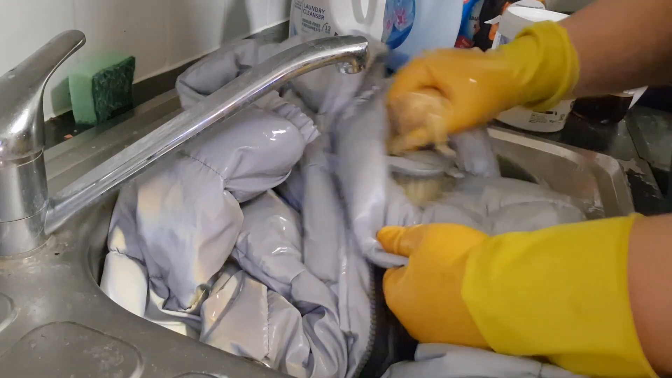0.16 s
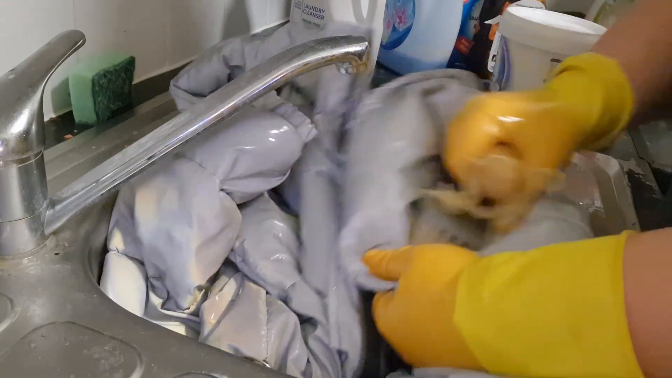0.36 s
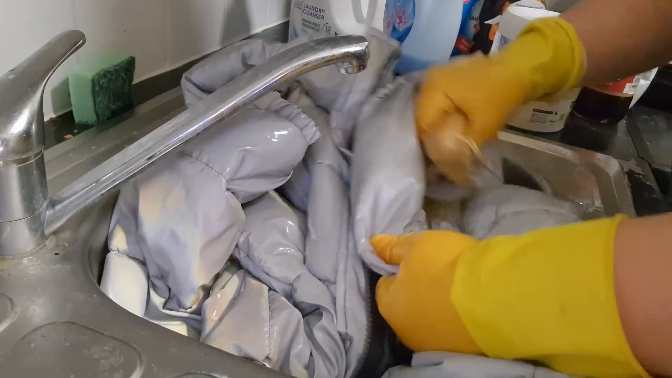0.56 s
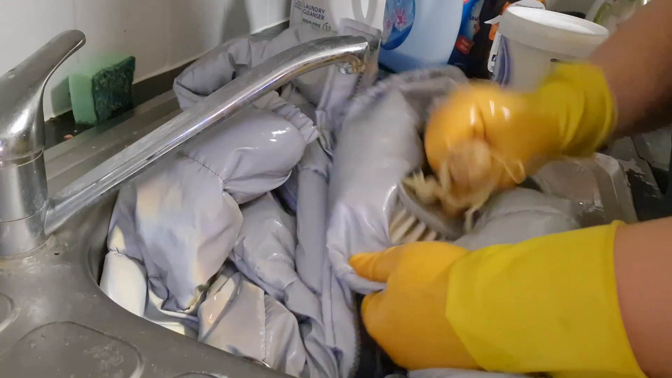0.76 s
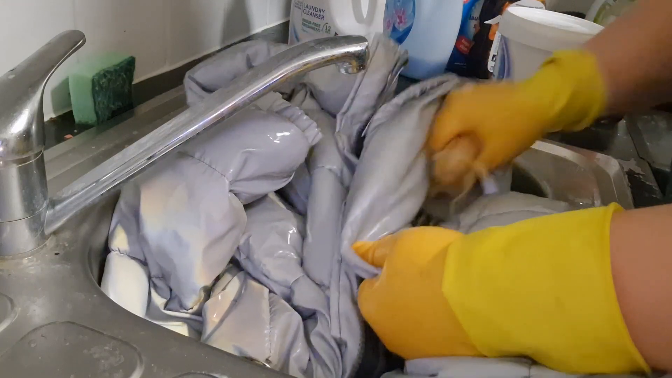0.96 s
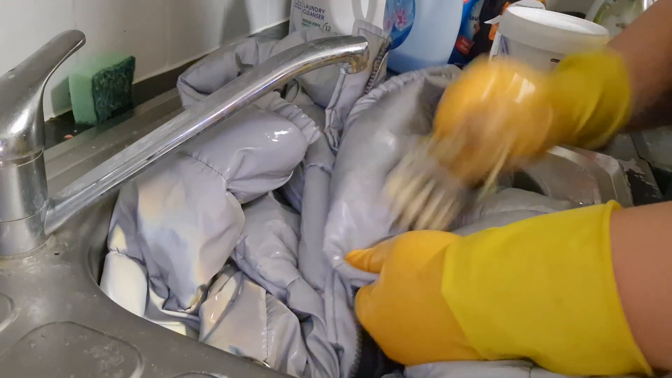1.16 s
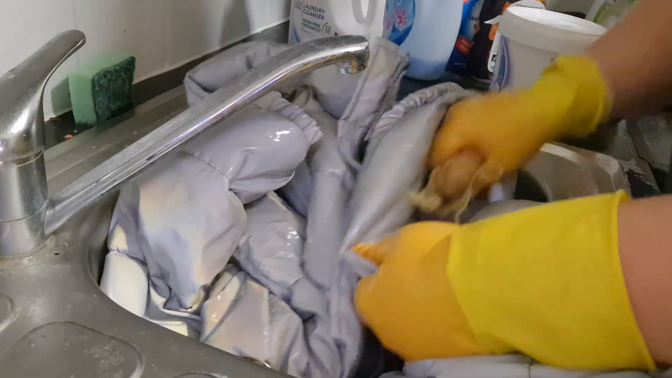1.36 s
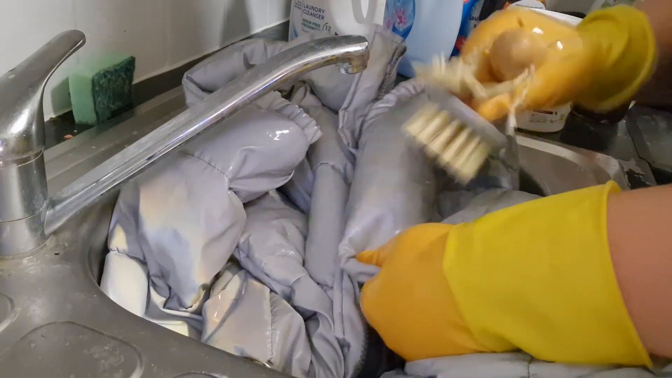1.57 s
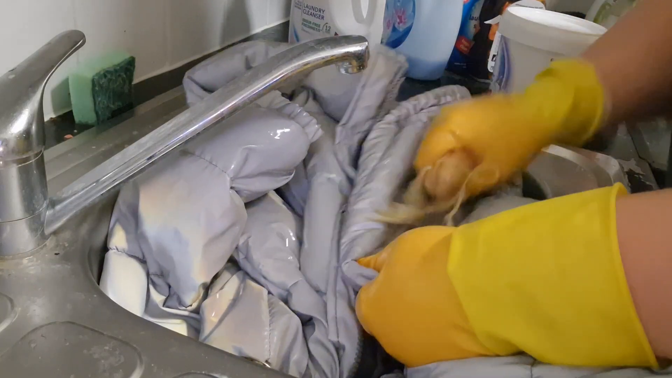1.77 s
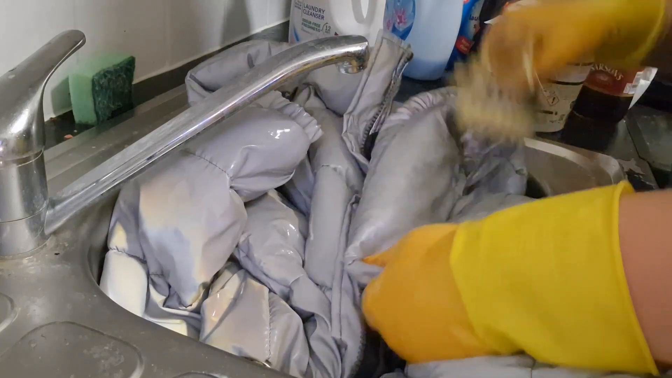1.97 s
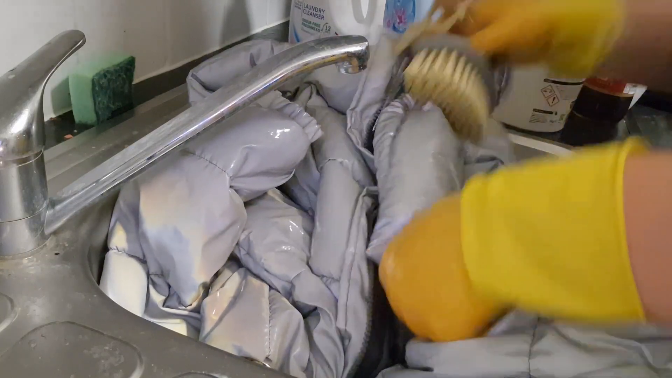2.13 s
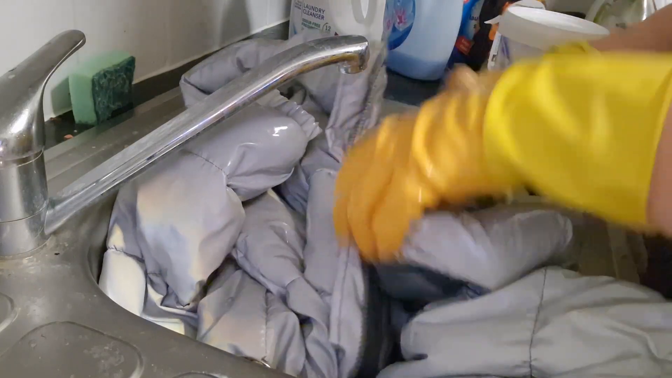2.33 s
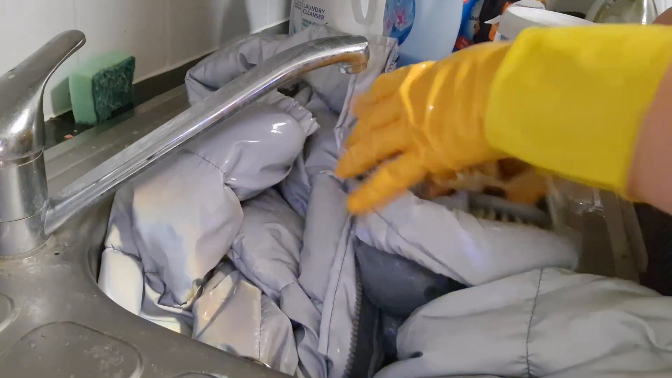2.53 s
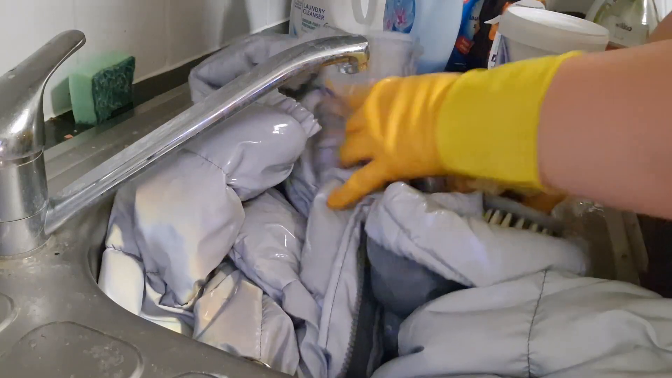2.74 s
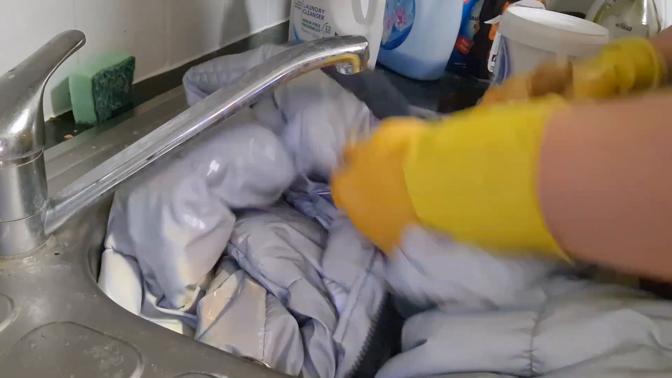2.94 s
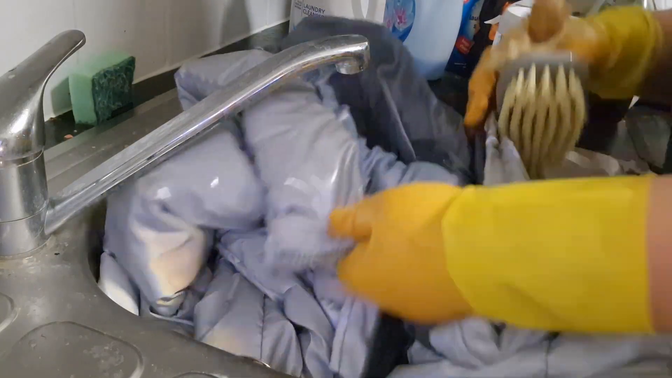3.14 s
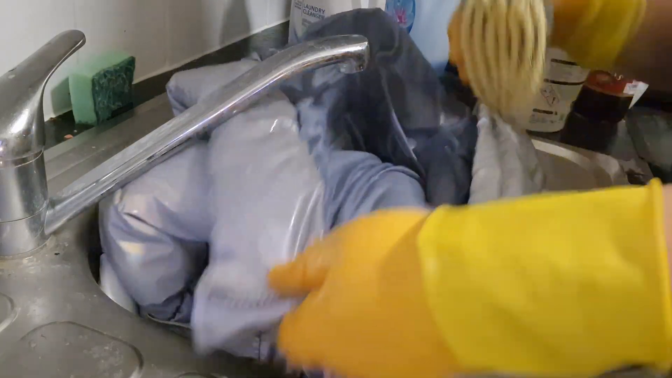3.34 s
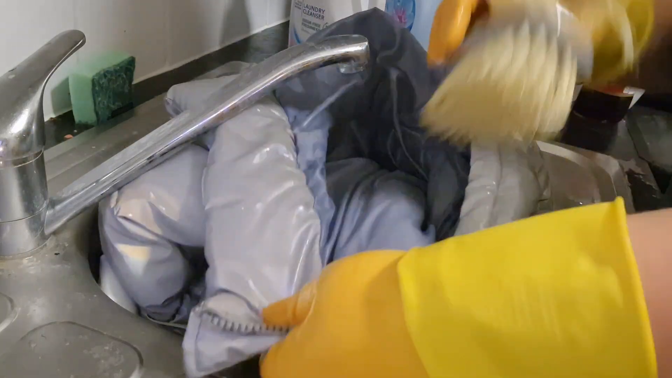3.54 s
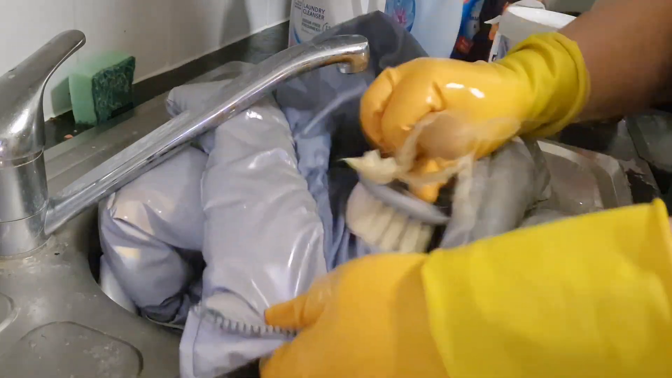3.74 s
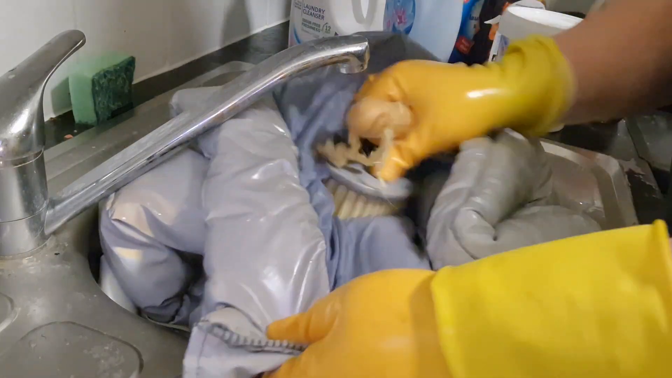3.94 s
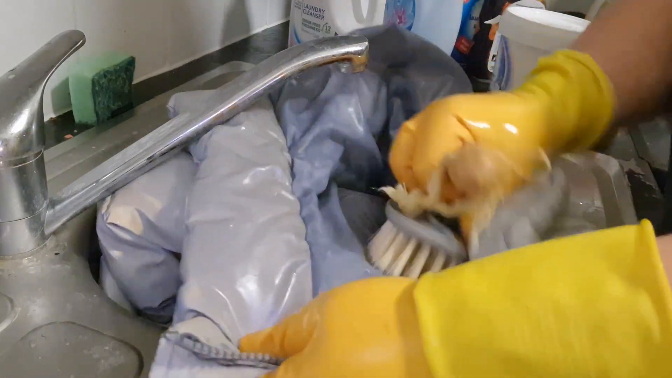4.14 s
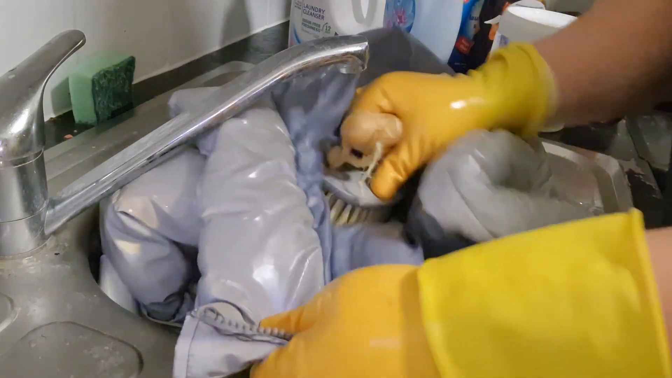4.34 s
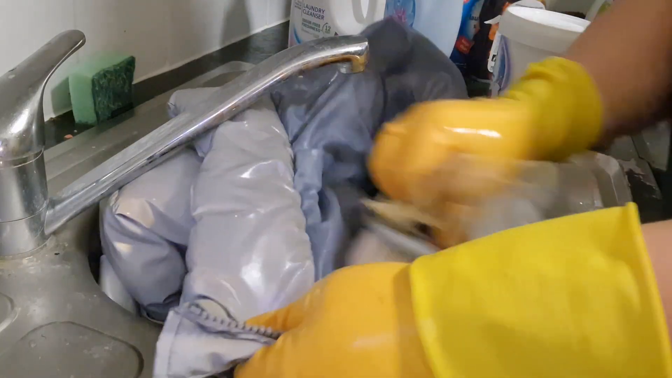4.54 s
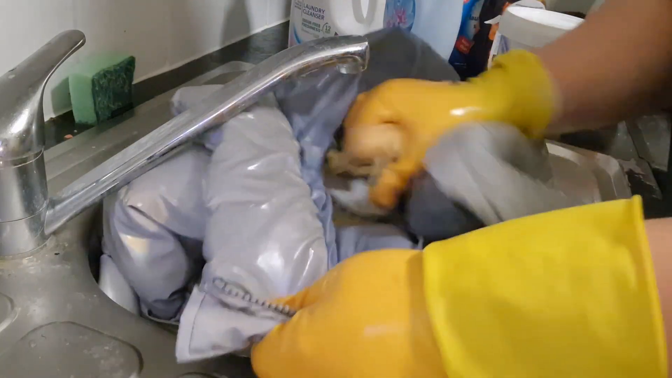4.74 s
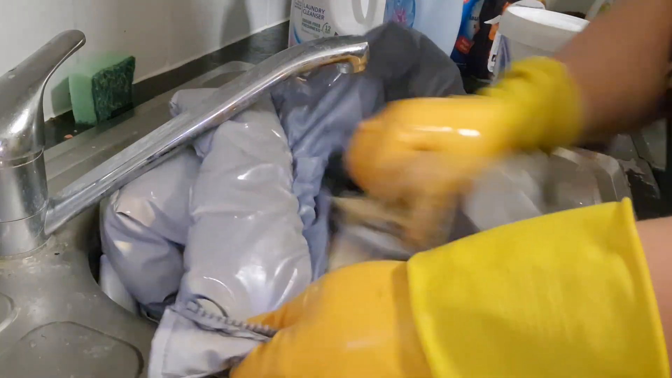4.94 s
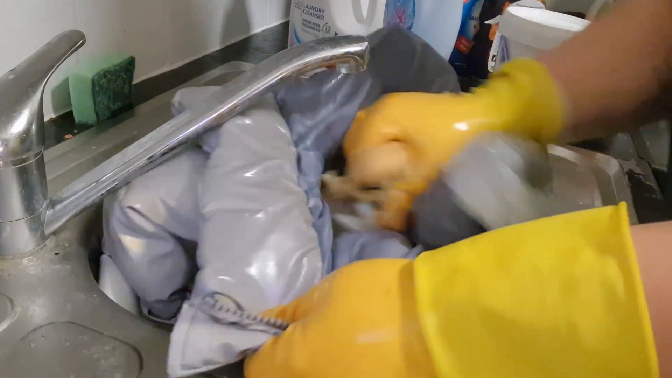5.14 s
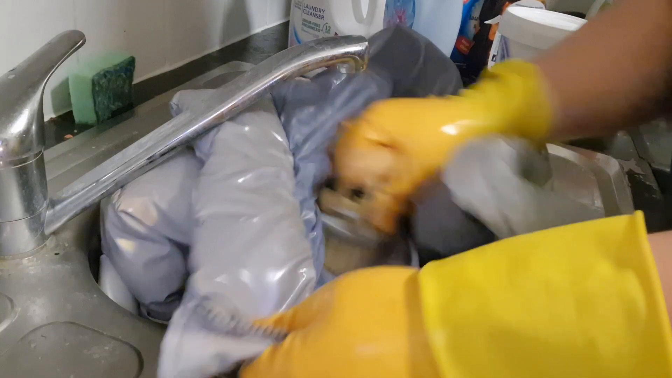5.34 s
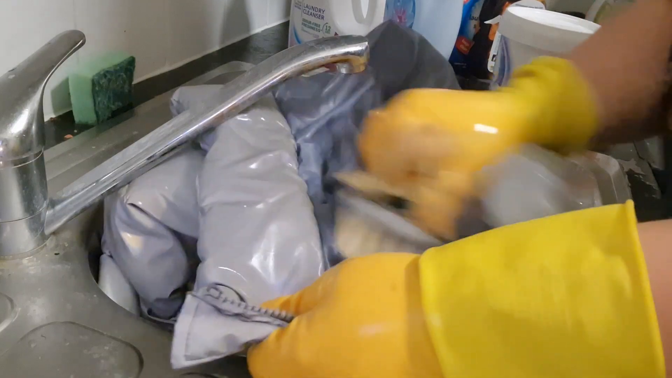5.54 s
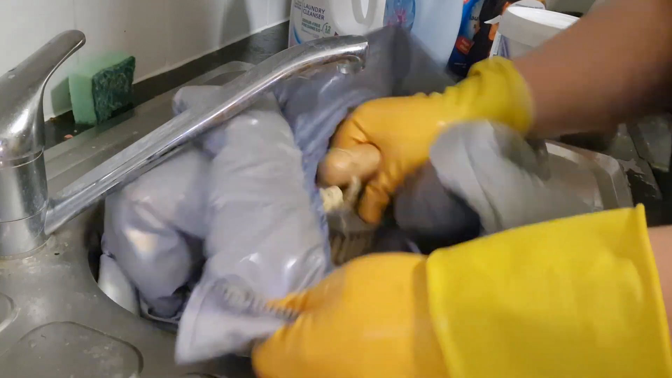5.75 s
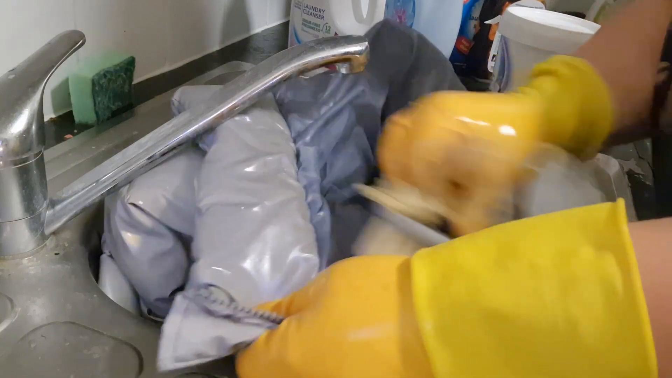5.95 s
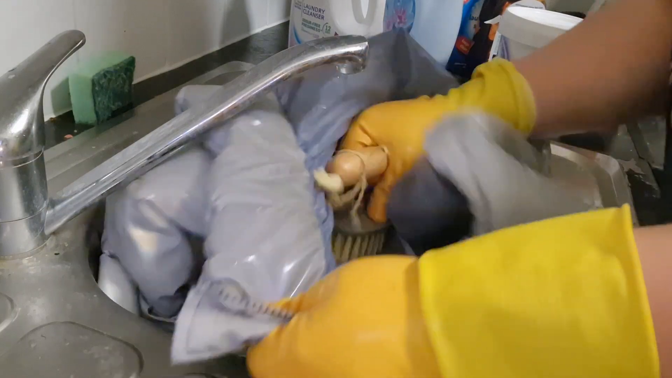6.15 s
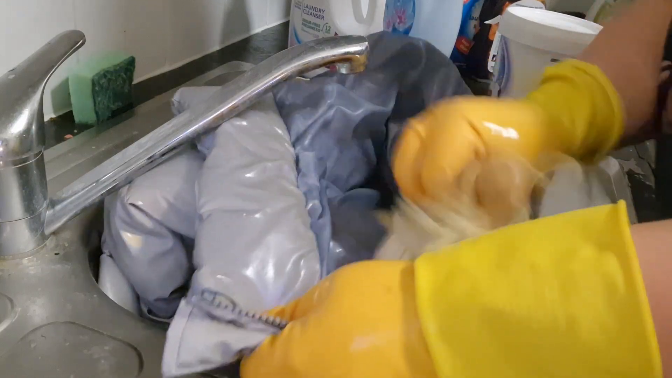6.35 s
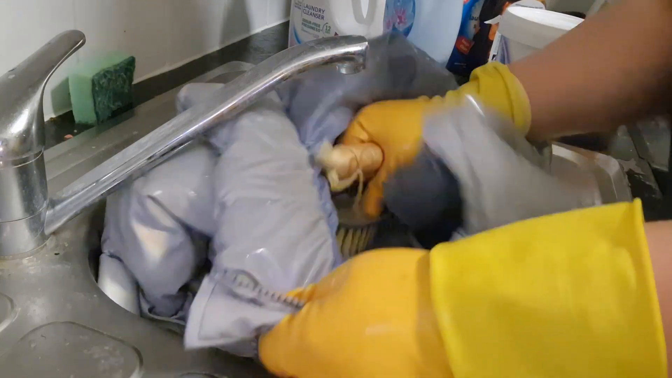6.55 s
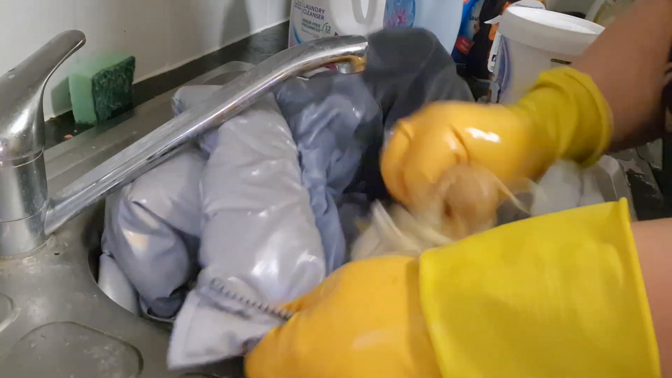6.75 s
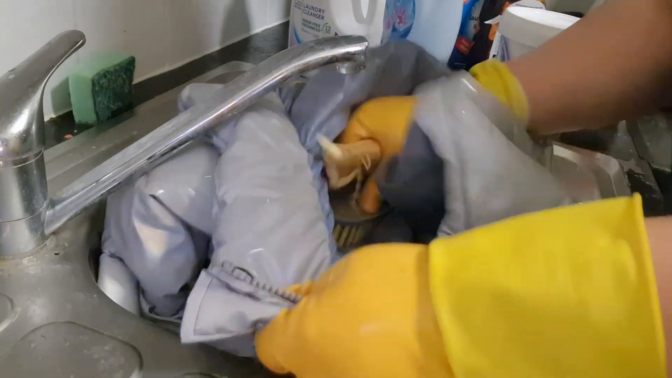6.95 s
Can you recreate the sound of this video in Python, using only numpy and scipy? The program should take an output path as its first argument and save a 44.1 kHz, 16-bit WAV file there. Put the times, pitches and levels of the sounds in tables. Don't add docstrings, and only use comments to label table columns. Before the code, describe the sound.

Bright, gritty bristle strokes rub over soaked fabric, alternating strong and lighter, while the basin resonates underneath. Midway the scrubbing stops; loose wet cloth rustles quietly, drops with a low thud and something clicks on the steel. Scrubbing returns fuller and rougher, hard pushes between softer pulls about every third of a second. Heard very close in stereo, in a small hushed kitchen with a short dull reverberation.

```python
import sys
import numpy as np
from scipy import signal
from scipy.fft import rfft, irfft
from scipy.io import wavfile
from scipy.ndimage import uniform_filter1d

SR = 44100
rng = np.random.default_rng(int(sys.argv[2]) if len(sys.argv) > 2 else 0)


def store_pcm(level_fs):
    pcm = np.round(np.clip(level_fs, -1, 1) * 32767).astype(np.int16)
    wavfile.write(sys.argv[1], SR, np.atleast_2d(pcm).T)


def invert_db(level):
    return 10 ** (np.asarray(level, dtype=float) / 20)


N = 313110
HZ = np.maximum(np.fft.rfftfreq(N, 1 / SR), 1)


# (fastest moment [s], speed-up [s], slow-down [s], speed [dB], weight [dB])
FIRST_STROKES = [(.064, .13, .168, -38, 4.5), (.238, .31, .15, -39.5, 3), (.494, .02, .046, -38, -7),
                 (.506, .396, .21, -45.4, 0), (.635, .21, .204, -38.5, 2), (.69, .06, 0.043, -49, 0),
                 (.85, .16, .12, -42, -2.5), (1.032, .22, .17, -38.1, 4.5), (1.095, 0.054, 0.045, -48, 2.5),
                 (1.234, .15, .19, -43, -6), (1.362, .067, 0.16, -42.5, 9.5), (1.441, .13, .27, -38.2, 2),
                 (1.545, 0.033, 0.038, -50, 2.5), (1.627, 0.051, .23, -43, -13),
                 (1.785, 0.046, 0.23, -54.5, 6), (1.839, 0.06, .33, -37.5, 3), (1.99, .3, .16, -40.5, -3.5),
                 (2.065, .12, 0.062, -46.5, -5.5)]
# (fastest moment [s], speed-up [s], slow-down [s], speed [dB], weight [dB])
RUSTLES = [(2.268, 0.05, 0.073, -53.0, -4), (2.371, 0.12, 0.15, -43.5, 0), (2.472, 0.438, 0.464, -55.5, 6),
           (2.912, 0.061, 0.12, -56.5, 7), (3.048, 0.28, 0.32, -52, 7.6), (3.159, 0.1, 0.3, -49.5, 7),
           (3.386, 0.296, 0.43, -52.5, 5), (3.407, 0.098, 0.7, -50.5, -12), (3.554, 0.12, 0.14, -49.5, 5.5),
           (3.649, 0.02, 0.1, -39, -13), (3.686, 0.011, 0.015, -36, -4.8),
           (3.704, 0.047, 0.387, -50.5, -10.5), (3.822, 0.083, 0.142, -52, 3.5)]
# (fastest moment [s], speed-up [s], slow-down [s], speed [dB], weight [dB])
LATER_STROKES = [(3.964, 0.25, 0.17, -36, 1), (4.121, 0.068, 0.51, -45, -5.0), (4.2, 0.04, 0.36, -57, -4.4),
                 (4.408, 0.15, 0.11, -37.5, 2), (4.628, 0.22, 0.09, -36.8, -0.8),
                 (4.763, 0.14, 0.17, -34, 2.5), (4.997, 0.18, 0.12, -39, -3), (5.13, 0.095, 0.18, -33.5, 3),
                 (5.373, 0.16, 0.11, -40.6, -3.1), (5.494, 0.074, 0.15, -34.6, 2.5),
                 (5.721, 0.17, 0.111, -39.5, -2), (5.848, 0.086, 0.174, -33.5, 2.6),
                 (6.093, 0.18, 0.14, -39, -3), (6.22, 0.085, 0.204, -33.5, 4),
                 (6.476, 0.18, 0.13, -40, -3.2), (6.605, 0.098, 0.23, -34, 3.5),
                 (6.867, 0.16, 0.14, -41.5, -3.5), (7.01, 0.09, 0.177, -33.5, 1.5)]
USUAL_SPEED_DB = -40


def answer(loudness, response):
    by_speed, by_weight, rising, falling, lag_s = response
    humps = []
    for strokes, db in zip([FIRST_STROKES, RUSTLES, LATER_STROKES], loudness):
        s, rise_s, fall_s, speed_db, weight_db = np.transpose(strokes)
        top_db = db + by_speed * (speed_db - USUAL_SPEED_DB) + by_weight * weight_db
        humps.append(np.c_[invert_db(top_db)] ** 2 * swell(s + lag_s, rise_s, fall_s, rising, falling))
    return np.vstack(humps)


def bristles(per_s, spread_db, clump_db):
    let_go = rng.random((3, N)) < per_s * invert_db(clump_db * drift(60)) / SR
    strength_db = spread_db * np.minimum(rng.exponential(1, (3, N)), 4)
    snaps = let_go * invert_db(strength_db) * rng.choice([-1, 1], (3, N))
    return ports(*(rms_one(snaps) + 0.87 * rng.standard_normal((3, N))))


def folds(x, scatter_db, t60_s, count):
    t, out = np.arange(2000) / SR, x
    middle = rfft(x) * band(586, 8600)
    for _ in range(count):
        echoes = rng.standard_normal(len(t)) * invert_db(-60 * t / t60_s) * (t > .0004)
        echoes = echoes / np.sqrt(np.sum(echoes ** 2))
        out = out + invert_db(scatter_db) * drift(4.4) * irfft(middle * rfft(echoes, N), N)
    return out


# (time [s], pitch [Hz])
RASP = [(0, 2700), (.47, 2130), (.62, 2700), (.92, 2220), (1.42, 2800), (1.9, 2760), (3.0, 2200),
        (3.5, 2520), (3.86, 1930), (4.04, 2570), (4.12, 2140), (5.1, 2080), (5.5, 2570), (5.7, 2250),
        (5.88, 2770), (6.12, 2231), (6.88, 2400), (6.97, 2940)]


def sink(x, modes, ring_db, wander_db):
    rasp_hz, = in_time(RASP)
    rings = 0
    for k, (hz, width, db) in enumerate(modes):
        near_rasp = np.exp(-(np.log2(hz / rasp_hz) / 0.4) ** 2)
        drive_db = 8.7 * near_rasp + wander_db * drift(9.6)
        rings = rings + (-1) ** k * invert_db(db + drive_db) * resonance(x, hz, width)
    return x + invert_db(ring_db) * rings


# (frequency [Hz], level per Hz [dB])
FRICTION = [(200, 3.5), (300, 0.5), (500, -4), (1100, -3.5), (1500, -6.5), (2200, -3), (3300, 2.5),
            (5700, 6), (7000, -3.5), (9000, 3), (16000, 1.5)]
# (frequency [Hz], width [Hz], level [dB])
SINK_BEFORE = [(388.4, 9.2, 4), (711, 45, 6.5), (1050, 47, -7), (1349, 18, 4.5), (1850, 140, -2),
               (2189, 34, 6.5), (2422, 34, -6.5), (2750, 39, -2), (3165, 67, -9), (5300, 40, 2),
               (7420, 260, -15.5)]
# (frequency [Hz], width [Hz], level [dB])
SINK_AFTER = [(366, 92, -1), (677, 85, 7.5), (1100, 114, 6.5), (1324, 8.1, -18), (1726, 200, -2),
              (2209, 77, 2.5), (2525, 68, -3), (3140, 310, 0), (3810, 140, -13.5), (3850, 66, 1),
              (4960, 95, -10), (5450, 76, 3), (7240, 140, -9)]
# (time [s], share [0-1])
HANDLING = [(0, 0.34), (2.15, 0.28), (2.3, 0.53), (3.55, 0.64), (3.8, 0.13), (7.1, 0.39)]
TURNED_S, TURNING_S = 3.24, 0.64


def scrubbing(tips_db, hiss_db, rasp_db, cloth_db):
    rub = shaped(bristles(per_s=6000., spread_db=4.5, clump_db=1.5), invert_db(at_hz(FRICTION)))
    rub = folds(rub, scatter_db=-6.0, t60_s=0.041, count=3)

    turned = np.clip((np.arange(N) / SR - TURNED_S) / TURNING_S + .5, 0, 1)
    before = rms_one(sink(rub, SINK_BEFORE, ring_db=7.5, wander_db=2.1))
    after = rms_one(sink(rub, SINK_AFTER, ring_db=8.0, wander_db=2.0))
    ringing = (1 - turned) * before + turned * after
    lifted = np.clip(*in_time(HANDLING), 0, 1)
    rub = rfft((1 - lifted) * ringing + lifted * rms_one(rub))

    layers = [(tips_db, 6500, 30000, .8),     # (level, low Hz, high Hz, flutter dB)
              (hiss_db, 3400, 6500, 1.1),
              (rasp_db, 1500, 3400, 1.5),
              (cloth_db, 250, 1500, 1.9)]
    catch = drift(23.0)
    out = 0
    for level_db, low_hz, high_hz, flutter_db in layers:
        part = evened(irfft(rub * band(low_hz, high_hz), N), span_s=.05)
        flutter = 0.33 * catch + 0.78 * drift(22.4)
        out = out + part * invert_db(level_db + flutter_db * flutter)
    return out


# (time [s], peak [dB], pitch [Hz], 60 dB decay [s], ring share [0-1])
KNOCKS = [(1.049, -33, 2120, 0.013, 0.7), (1.538, -20.5, 3800, 0.022, 0.87), (2.377, -38, 3200, .02, .5),
          (2.602, -34, 680, 0.051, 0.78), (2.757, -39, 646, 0.05, 0.96), (2.836, -40.5, 1140, 0.042, 0.7),
          (2.869, -38, 450, .02, 0.5), (2.906, -28.5, 386, 0.032, 0.46), (3.642, -32, 4050, .03, 0.6),
          (3.689, -37, 5350, .015, 0.05), (3.711, -33, 2000, 0.017, 0.5), (3.767, -23, 5390, 0.11, 0.33),
          (3.778, -20.5, 5630, 0.053, 0.47), (3.834, -21.5, 2360, 0.019, 0.55),
          (5.468, -21, 2290, 0.05, 0.64), (6.977, -20, 2960, .04, 0.3), (2.474, -29, 3000, .008, 0.6),
          (2.55, -34, 500, .02, 0.6)]


def knocks():
    out, t = np.zeros((3, N)), np.arange(3000) / SR
    cracks = rng.standard_normal((len(KNOCKS), 3, len(t)))
    for (s, db, hz, t60, share), crack in zip(KNOCKS, cracks):
        at = round(s * SR)
        fade = invert_db(-60 * t / max(t60, .003))
        ping = np.sin(2 * np.pi * hz * t) * invert_db(-hz * t * 0.58)
        ring = ping + .5 * rms_one(resonance(crack, hz, 0.33 * hz))
        knock = invert_db(db) * (share * ring + .5 * (1 - share) * crack) * fade
        out[:, at:at + len(t)] += knock[:, :N - at]
    return ports(*out)


# (first strokes [dB], rustles [dB], later strokes [dB], brush at rest [dB])
LOUDNESS = [
    (-40.5, -44, -39.5, -80),
    (-42, -44, -42, -61),
    (-45, -47.5, -38.5, -66),
    (-45.5, -54.5, -43.5, -80),
    (-46, -54.5, -46, -60.5),
]
# (share of speed [dB/dB], share of weight [dB/dB], sharpness rising [power], sharpness falling [power], lag [s])
RESPONSE = [
    (1.08, .01, 5.56, 6.04, .0003),
    (0.76, 0.3, 4.8, 4.6, .0023),
    (.66, .61, 4.56, 4.43, 0.00087),
    (-0.0086, 1.03, 2.75, 2.4, 0.0024),
    (0.22, .74, 2.4, 2.4, 0.0068),
]
# (time [s], boom level [dB])
LEANS = [(.075, -39), (.145, -36), (.26, -40.5), (.381, -42), (.546, -40), (.673, -42), (.831, -44),
         (.919, -38), (1.058, -36), (1.371, -28.9), (1.68, -51), (1.947, -37.5), (2.047, -43.5),
         (2.549, -47.5), (2.757, -48), (2.926, -41.5), (3.185, -46.5), (3.639, -45), (4.017, -41.5),
         (4.41, -38), (4.658, -43), (4.725, -39.3), (4.8, -45), (5.3, -48), (5.496, -39), (5.9, -51),
         (6.099, -42.5), (6.312, -43), (6.678, -37.4), (7.056, -37.5)]
LEAN_RISE_S, LEAN_FALL_S, LEAN_SHARPNESS = 0.1, .193, 15.3


def leaning():
    s, db = np.transpose(LEANS)
    humps = swell(s, LEAN_RISE_S + 0 * s, LEAN_FALL_S + 0 * s, LEAN_SHARPNESS, LEAN_SHARPNESS)
    leans = np.c_[invert_db(db)] ** 2 * humps
    return to_level(np.vstack([answer(LOUDNESS[-1], RESPONSE[-1]), leans]), LOUDNESS[-1][-1])


# (frequency [Hz], width [Hz], level [dB])
BASIN = [(45.5, 24, -13), (67, 33, -10.5), (109.7, 11, 3.5), (137.1, 10.9, 2.5), (158.3, 33.4, -6),
         (203, 31, -15.5)]
# (time [s], level [dB])
THUMPS = [
    (1.353, -30),
    (2.739, -48),
    (2.907, -24),
    (5.292, -39),
]


def basin(boom_db):
    pushes = rng.standard_normal(N) * invert_db(1.0 * drift(18.4))
    drops = np.zeros(N)
    drops[[round(s * SR) for s, db in THUMPS]] = invert_db(np.array(THUMPS)[:, 1] + 41.5)
    plate = 0
    for k, (hz, width, db) in enumerate(BASIN):
        broad = resonance(np.array([pushes, drops]), hz, 3 * width)
        plate = plate + (-1) ** k * invert_db(db) * resonance(broad, hz, width)
    shaken, struck = plate
    sway = rms_one(shaped(rng.standard_normal(N), band(40, 350)))
    sway = invert_db(-22) * sway * [[1], [-1]]
    return invert_db(boom_db) * (evened(shaken, span_s=0.062) + sway) + struck


# (frequency [Hz], share [0-1])
SHARED = [(100, 1), (300, 0.91), (700, 0.83), (1500, 0.57), (3000, 0.55), (6000, 0.23), (10000, 0.1),
          (16000, 0.082)]
# (frequency [Hz], left minus right [dB])
TILT = [(60, 4.5), (110, -3.5), (200, -1.5), (380, 1.0), (700, 1.5), (1290, -2), (2380, 3.5), (4400, 0.5),
        (8120, 3), (15000, -0.5)]
# (delay [ms], left level [dB], right level [dB])
WALLS = [(.9, -31, -36), (1.7, -46.5, -18), (2.6, -7.5, -33), (3.9, -9, -11.5)]
RIGHT_LAG_S = .00012


def ports(near, own_left, own_right):
    left, right = 1, 1
    for ms, left_db, right_db in WALLS:
        bounce = np.exp(-2j * np.pi * HZ * ms / 1000) * band(1050, 30000)
        left = left + invert_db(left_db) * bounce
        right = right - invert_db(right_db) * bounce
    right = right * np.exp(-2j * np.pi * HZ * RIGHT_LAG_S)
    share, tilt = np.clip(at_hz(SHARED), 0, 1), invert_db(at_hz(TILT) / 2)
    alike, apart = np.sqrt(share), np.sqrt(1 - share)
    return np.array([shaped(near, alike * left * tilt) + shaped(own_left, apart * tilt),
                     shaped(near, alike * right / tilt) + shaped(own_right, apart / tilt)])


KITCHEN_T60_S, KITCHEN_DB = 0.14, -11


def kitchen(x):
    t = np.arange(N) / SR
    tail = rng.standard_normal((2, N)) * invert_db(-60 * t / KITCHEN_T60_S) * (t > .008)
    tail = tail / np.sqrt(np.sum(tail[0] ** 2))
    return shaped(x.mean(axis=0), rfft(tail) * band(200, 4800))


# (frequency [Hz], level per Hz [dB])
ROOM_TONE = [(18, -43), (30, -4.5), (130, -1.5), (243, -14.5), (389, -9.5), (767, -16), (945, -27),
             (1050, -16), (5310, -26), (15500, -29.5)]
ROOM_TONE_DB = -53.5


def room_tone():
    hush = shaped(ports(*rng.standard_normal((3, N))), invert_db(at_hz(ROOM_TONE)))
    return invert_db(ROOM_TONE_DB) * rms_one(hush)


def rms_one(x):
    return x / np.sqrt(np.mean(x ** 2) + 1e-20)


def at_hz(points):
    hz, value = np.transpose(points)
    return np.interp(np.log(HZ), np.log(hz), value)


def in_time(rows):
    s, *columns = np.transpose(rows)
    return [np.interp(np.arange(N) / SR, s, c) for c in columns]


def shaped(x, response):
    return irfft(rfft(x) * response, N)


def band(low_hz, high_hz):
    return 1 / np.sqrt((1 + (low_hz / HZ) ** 12) * (1 + (HZ / high_hz) ** 12))


def resonance(x, hz, width_hz):
    r = np.exp(-np.pi * max(width_hz, 5) / SR)
    poles = [1, -2 * r * np.cos(2 * np.pi * hz / SR), r * r]
    return signal.lfilter([(1 - r * r) / 2, 0, (r * r - 1) / 2], poles, x)


def drift(rate):
    r = np.exp(-80 * np.pi * rate / SR)
    slow = signal.lfilter([1], [1, -2 * r, r * r], rng.standard_normal(N // 40 + 2002))[2000:]
    return np.interp(np.arange(N) / 40, np.arange(len(slow)), rms_one(slow))


def evened(x, span_s):
    power = np.atleast_2d(x).mean(axis=0) ** 2
    size = max(int(span_s * SR), 8)
    return x / np.sqrt(uniform_filter1d(uniform_filter1d(power, size), size) + 1e-12)


def swell(peak_s, rise_s, fall_s, rising, falling):
    since = np.arange(N * 1000 // SR + 2) / 1000 - np.c_[peak_s]
    climb = -since / np.c_[np.maximum(rise_s, .005)]
    decline = since / np.c_[np.maximum(fall_s, .005)]
    reach = np.where(since < 0, climb, decline)
    return np.cos(np.pi / 2 * np.minimum(reach, 1)) ** (2 * np.where(since < 0, rising, falling))


def to_level(power, resting_db):
    total = power.sum(axis=0) + invert_db(resting_db) ** 2
    return np.interp(np.arange(N) / SR, np.arange(len(total)) / 1000, 10 * np.log10(total))


def scene():
    levels = [to_level(answer(db, response), db[-1]) for db, response in zip(LOUDNESS[:-1], RESPONSE)]
    close = scrubbing(*levels) + knocks()
    return close + invert_db(KITCHEN_DB) * kitchen(close) + basin(leaning()) + room_tone()


def low_pass(x):
    return signal.sosfilt(signal.butter(12, 16800, fs=SR, output="sos"), x)


# (frequency [Hz], level [dB])
MICROPHONE = [(6000, -1), (7700, 1), (8100, -5.5), (9500, -1), (10400, -0.5), (11000, -2), (11700, 2.5),
              (16000, 0.5)]
CUTOFF_HZ = 15780


def record(dry):
    top_cut = np.exp(-(HZ / CUTOFF_HZ) ** 300)
    mix = shaped(dry, invert_db(at_hz(MICROPHONE)) * top_cut)
    return low_pass(mix)


dry = scene()
out = record(dry)
store_pcm(out)
```